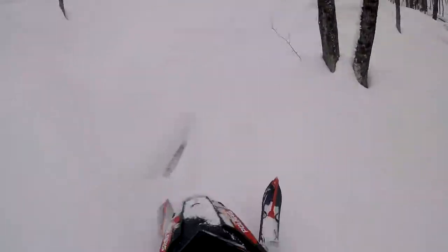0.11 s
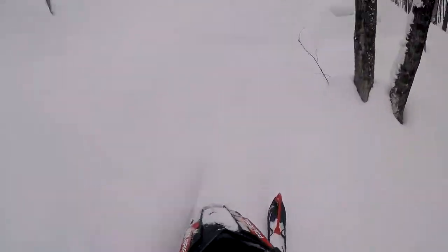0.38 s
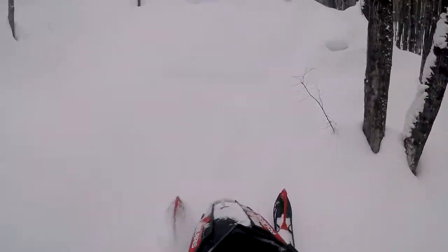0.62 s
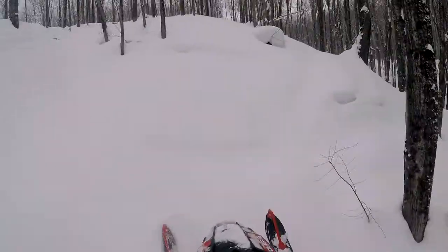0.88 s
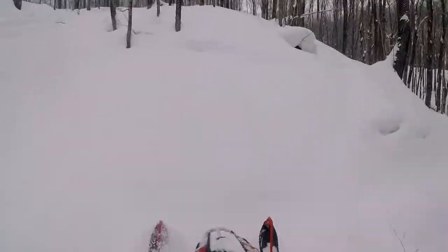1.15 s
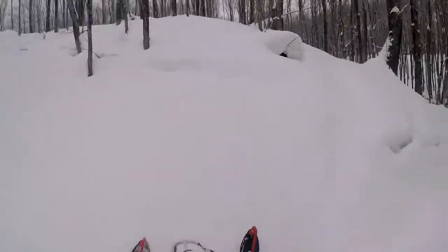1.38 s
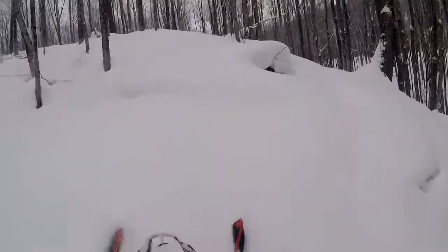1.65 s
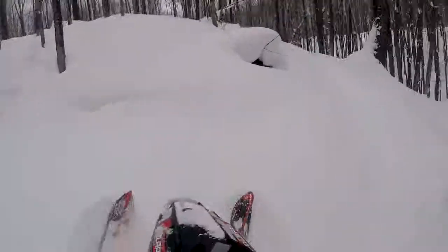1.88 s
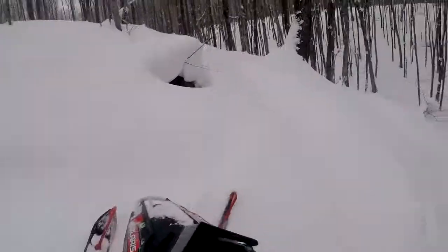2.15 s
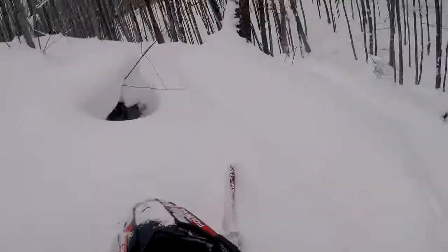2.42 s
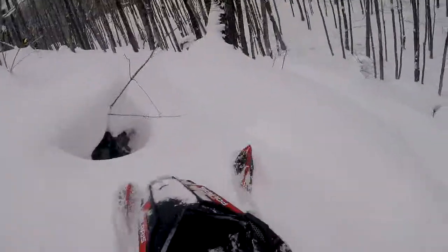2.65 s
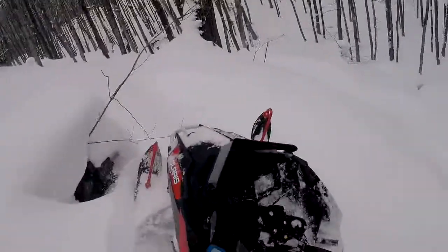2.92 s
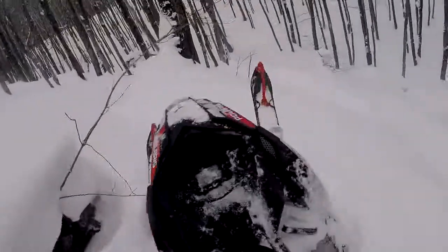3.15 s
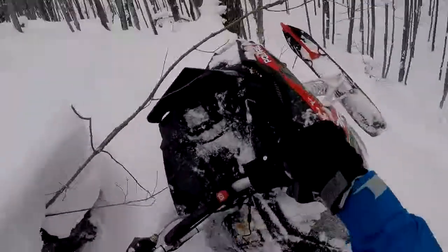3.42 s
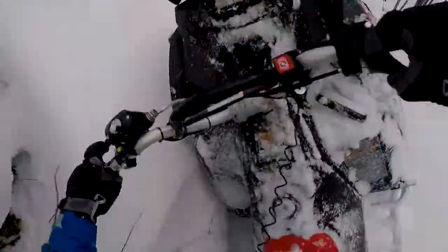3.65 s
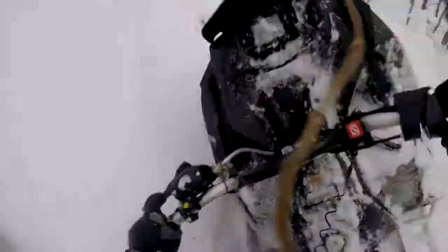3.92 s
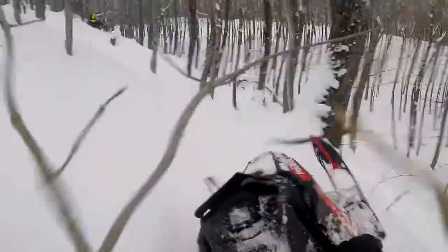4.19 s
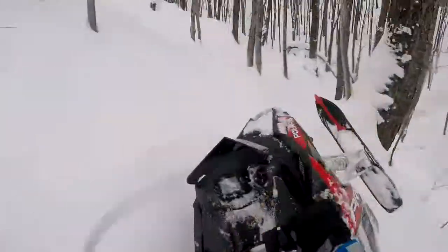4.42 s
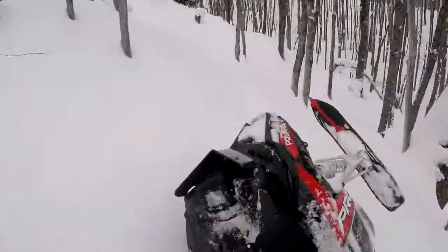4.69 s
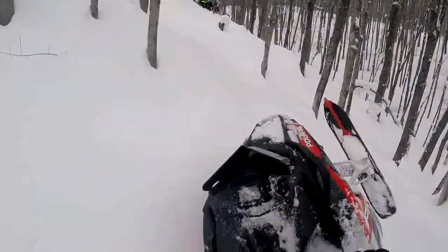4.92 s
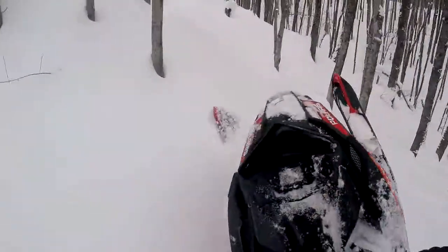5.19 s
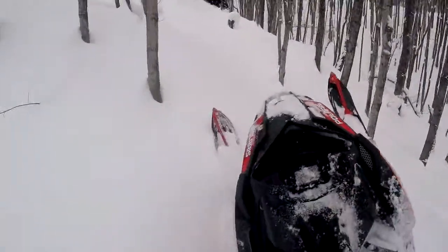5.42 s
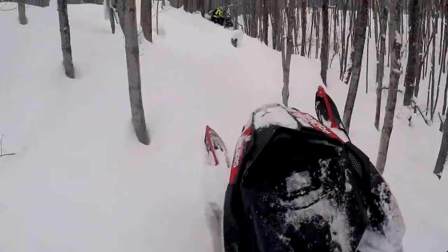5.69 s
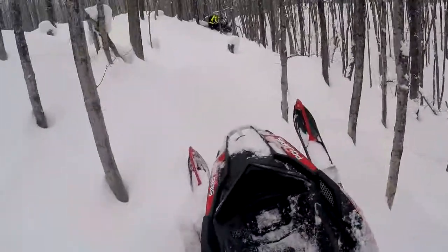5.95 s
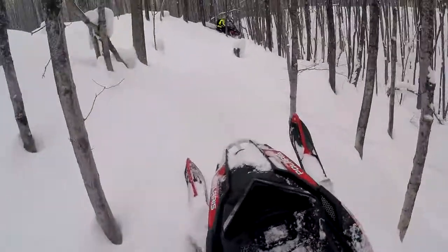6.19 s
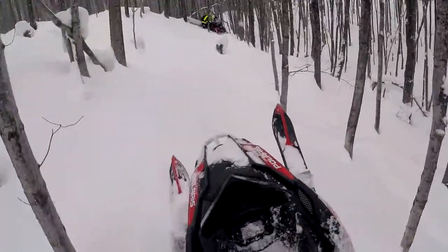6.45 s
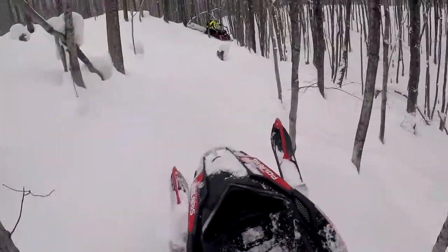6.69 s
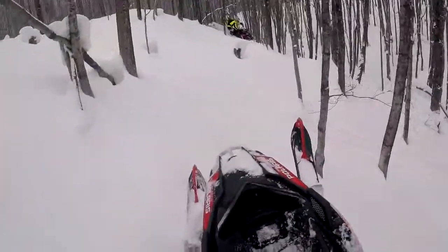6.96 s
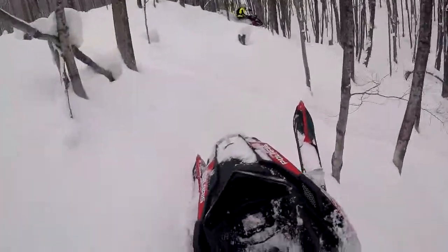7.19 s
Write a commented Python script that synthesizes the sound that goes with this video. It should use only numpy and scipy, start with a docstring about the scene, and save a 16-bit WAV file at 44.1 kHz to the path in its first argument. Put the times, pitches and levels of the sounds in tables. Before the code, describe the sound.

A snowmobile's raspy two-stroke engine revs up and down over low rumble, then a branch cracks and scrapes loudly before the engine swells back.

```python
"""Snowmobile in deep snow, struck by a branch

A two-cylinder two-stroke snowmobile revs up and down, heard by a helmet camera: crank-order tones, coloured
firing pulses and pulsing noise over a lumpy sub-bass. A branch whips and drags across the housing: noise
bursts, ringing modes, membrane swings and random slips crack, thump and scrape. After it the engine sounds
faint and its level swells back."""
import sys
import numpy as np
from scipy import signal
from scipy.fft import rfft, irfft
from scipy.io import wavfile
from scipy.ndimage import uniform_filter1d

SR = 44100
rng = np.random.default_rng(int(sys.argv[2]) if len(sys.argv) > 2 else 0)


def pcm_store(signal):
    """Save signal as 16-bit PCM."""
    levels = np.round(np.clip(np.atleast_2d(signal), -1, 1) * 32767)
    wavfile.write(sys.argv[1], SR, levels.astype(np.int16).T)


def volts_from_decibels(level):
    """Turn decibel levels (scalar or array-like) into linear amplitude factors."""
    exponent = np.asarray(level, float) / 20
    return 10 ** exponent


N = 323253  # length of the sound in samples, about 7.33 s

# modes of the camera housing: mode_hz, level_db, t60_s
HOUSING_MODES = [(650, -6, .05), (810, -1, .045), (960, 0, .03), (1180, 1, .035), (1420, -3, .025),
                 (1830, 0, .045), (2250, -5, .02), (2900, -6, .015)]
# narrow and broad panel resonances of the machine: centre_hz, width_hz, gain_db
PANEL_MODES = [(1412, 35, 10), (1729, 130, 8), (1953, 130, 6.5), (2600, 420, 5), (5020, 1100, 4),
               (6720, 43, 10), (6940, 220, -2), (7770, 410, 11.5), (9900, 190, 2.5), (11360, 130, 5.5),
               (13200, 670, 2)]
CRUISE_HZ = 91  # crank speed at which the speed-dependent levels are neutral


def rms_one(x):
    """Scales x to rms 1."""
    return x / np.sqrt(np.mean(x ** 2) + 1e-20)


def in_time(rows):
    """Draws each column of a curve table at every sample; the first column is time in seconds."""
    s, *columns = np.transpose(rows)
    return [np.interp(np.arange(N) / SR, s, column) for column in columns]


def coloured(x, spectrum, peaks=()):
    """Filters x through a spectrum, straight in dB over log frequency, plus resonances; rms 1."""
    bin_hz = np.fft.rfftfreq(N, 1 / SR)
    hz, db = np.transpose(spectrum)
    gain = volts_from_decibels(np.interp(np.log(bin_hz + 1), np.log(hz), db, left=-120, right=-120))
    for peak_hz, width_hz, peak_db in peaks:
        gain = gain * volts_from_decibels(peak_db / (1 + (2 * (bin_hz - peak_hz) / width_hz) ** 2))
    return rms_one(irfft(rfft(x) * gain, N))


def drift(rate_hz):
    """Slow random wander of rms 1: noise through a two-pole low-pass, drawn every 40 samples."""
    r = np.exp(-80 * np.pi * rate_hz / SR)
    noise = rng.standard_normal(N // 40 + 2002)
    slow = signal.lfilter([1], [1, -2 * r, r * r], noise)[2000:]  # the filter has settled
    return np.interp(np.arange(N) / 40, np.arange(len(slow)), rms_one(slow))


def ring(clicks, hz, t60_s):
    """Two-pole resonator: each unit click starts a decaying unit sine."""
    r = 1000 ** (-1 / (t60_s * SR))
    w = 2 * np.pi * hz / SR
    return signal.lfilter([0, np.sin(w)], [1, -2 * r * np.cos(w), r * r], clicks + 1e-18)


def band(x, low_hz, high_hz):
    """Butterworth band-pass."""
    return signal.sosfilt(signal.butter(2, [low_hz, high_hz], "band", fs=SR, output="sos"), x)


def rumble():
    """Lumpy sub-bass from the track and the rider's jolts, shaking the microphone: coloured noise."""
    # rumble before its lumps: time_s, level_db
    rumble_level = [(0.0, -36), (0.12, -27.5), (0.49, -34.5), (0.53, -25), (1.37, -28), (1.41, -23.5),
                    (1.75, -16), (1.92, -35.5), (2.04, -25), (2.23, -39), (2.28, -24), (2.76, -27),
                    (2.9, -17), (3.18, -27), (3.82, -27), (4.14, -35), (4.23, -21), (4.41, -54),
                    (4.53, -38.5), (4.9, -61.5), (5.39, -28.5), (5.82, -40), (5.9, -24.5), (6.25, -42),
                    (6.41, -27), (6.72, -39.5), (7.19, -26.5), (7.33, -36)]
    # its spectrum: freq_hz, gain_db
    rumble_colour = [(8, -10.5), (15, 18), (24, 19.5), (33, 15), (50, -18), (90, -52), (200, -68.5)]
    level_db, = in_time(rumble_level)
    lumps_db = 2 * drift(4)
    return coloured(rng.standard_normal(N), rumble_colour) * volts_from_decibels(level_db + lumps_db)


def drag():
    """Twigs drag on the housing: dense uneven slips excite its modes, with noise buffeting below."""
    # dragging twigs: time_s, scrape_db, bright_scrape_db, low_buffeting_db
    drag_levels = [(3.72, -34, -58, -40), (3.775, -26.5, -49, -28), (3.8, -21.5, -44, -22),
                   (3.872, -39, -63, -20.5), (3.905, -48, -72, -29.5), (3.93, -36.5, -51, -24.5),
                   (3.99, -28, -57, -23), (4.02, -33.5, -86, -40), (4.2, -33, -46.5, -26),
                   (4.27, -22.5, -36, -28.5), (4.38, -25.5, -40, -40), (4.41, -41, -52, -39),
                   (4.43, -23.5, -38, -40), (4.5, -33, -38, -40), (4.55, -60, -65, -42)]
    scrape_db, bright_db, low_db = in_time(drag_levels)
    on = np.interp(np.arange(N) / SR, [3.717, 3.722, 4.54, 4.56], [0, 1, 1, 0])
    heights_db = 3.3 * np.minimum(rng.exponential(1, N), 4)
    slips = volts_from_decibels(heights_db) * rng.choice([-1, 1], N)
    slips_per_s = 6000 * volts_from_decibels(4.0 * drift(60))
    slips = slips * (rng.random(N) < slips_per_s / SR)
    # the modes ring shorter here than under a blow
    body = rms_one(sum(volts_from_decibels(db) * ring(slips, hz, 0.41 * t60_s) for hz, db, t60_s in HOUSING_MODES))
    grit = rms_one(band(band(slips, 710, 1900), 660, 3000))
    scrape = rms_one(body + 4.1 * grit)
    bright = rms_one(band(slips, 2700, 5100))
    buffeting = rms_one(band(rng.standard_normal(N), 82, 220))
    return on * (volts_from_decibels(scrape_db) * scrape + volts_from_decibels(bright_db) * bright + volts_from_decibels(low_db) * buffeting)


def thumps():
    """Each push swings the microphone membrane for a cycle or two: a heavily damped sine."""
    # pushes on the membrane: start_s, relative_level_db, swing_hz
    pushes = [(3.72, 0.5, 108), (3.735, -2.5, 211), (3.792, -8, 72.4), (3.814, -18, 88.8), (3.849, -1, 93),
              (3.868, -20, 80.7), (3.91, -9, 144), (3.929, -14.5, 54), (3.956, -8.5, 67.5),
              (3.994, -14.5, 83.4), (4.144, -8.5, 96), (4.187, -1.5, 115), (4.209, -21, 50.6),
              (4.244, -8.5, 94), (4.286, -14.5, 85), (4.366, -22, 123), (4.486, -24.5, 191)]
    out = np.zeros(N)
    for s, level_db, swing_hz in pushes:
        click = np.zeros(8000)
        click[0] = volts_from_decibels(level_db + 7.5)
        at = round(s * SR)
        out[at:at + len(click)] += ring(click, swing_hz, 3.74 / swing_hz)
    return out


def snaps():
    """Thin twigs tick on the housing: a few milliseconds of bright noise."""
    # placed ticks: start_s, relative_level_db
    twig_ticks = [(2.4188, -25), (3.6448, -20), (3.719, -5), (4.2018, -23), (4.286, -8.5), (4.2904, -3),
                  (4.295, -11), (4.305, -13.5), (4.314, -7.5), (4.3254, -18), (4.4386, -26), (4.446, -13),
                  (4.4552, -12), (4.463, -3), (4.4753, -17), (4.483, -18), (4.526, -13), (4.5315, -15),
                  (5.014, -22)]
    out = np.zeros(N)
    t = np.arange(int(.03 * SR)) / SR
    # ten faint ticks at random while the thin twigs pass
    faint = [(rng.uniform(4.18, 4.52), rng.normal(-40, 5)) for _ in range(10)]
    for s, level_db in list(twig_ticks) + faint:
        fading = rng.standard_normal(len(t)) * 1000 ** (-t / .007)  # 60 dB down in 7 ms
        tick = band(fading, 4000, 12500)
        at = round(s * SR)
        out[at:at + len(t)] += volts_from_decibels(level_db - 4.0) * tick / np.abs(tick).max()
    return out


def cracks():
    """Each contact is a splintering burst that holds, then stops, beside briefly ringing modes."""
    # contacts: start_s, relative_level_db, low_knock_db and brightness_db (both relative), length_s
    contacts = [(2.418, -28, -24, 7.5, 0.0044), (3.719, 10.5, -29, -7, 0.0048), (3.73, 4, -2, -28, 0.0053),
                (3.736, -3.5, -13, -35, 0.008), (3.787, -5.5, -2.5, -44, 0.0061),
                (3.813, -7, -33, -31, 0.0081), (3.844, -4, -4, -33, 0.0091),
                (3.864, -3.5, 0.5, -31, 0.0069), (3.909, -2, -13.5, -17, 0.0025),
                (3.914, -10, -9, -44, 0.013), (3.955, -10, -14, -28, 0.006), (3.964, -14, -15, -22, 0.0052),
                (3.973, -1.5, -6, -43, 0.003), (3.992, -16, -24, -47, 0.0031), (4, -9.5, -33, -48, 0.0039),
                (4.089, -15, -35, -49, 0.0058), (4.143, -13, 4, -25, 0.011),
                (4.187, -5.5, 0.5, -20, 0.0066), (4.224, -5.5, -29, -31, 0.0027),
                (4.242, -3, -26, -37, 0.0064), (4.257, -12, -15, -16, 0.013), (4.283, -5, -24, 0.5, 0.01),
                (4.304, -12, -26, 4, 0.0043), (4.316, -8, -39, -38, 0.0043), (4.336, -10, -12, -4, 0.0025),
                (4.369, -9.5, -36, -22, 0.0047), (4.43, -13, -23, -7, 0.018), (4.457, -10, -33, -3, 0.0084),
                (4.46, -7, -27, -34, 0.025), (4.486, -2, -26.5, -13.5, 0.0086),
                (4.503, -11.5, -38, -24.5, 0.021), (4.531, -5.5, -31, -11, 0.0077),
                (5.012, -30.5, -22, 7.5, 0.0063)]
    out = np.zeros(N)
    t = np.arange(int(.15 * SR)) / SR
    for s, level_db, low_db, bright_db, length_s in contacts:
        white = rng.standard_normal((2, len(t)))
        # the product of two noises is spiky, as splintering is
        burst = white[0] * np.abs(white[1]) * np.exp(-(t / length_s) ** 2)
        spread_db = rng.normal(0, 4.0, len(HOUSING_MODES))  # each blow excites the modes differently
        body = sum(volts_from_decibels(db + more_db) * ring(burst, hz, t60_s)
                   for (hz, db, t60_s), more_db in zip(HOUSING_MODES, spread_db))
        parts = [(band(body, 1100, 4400), -9.0),
                 (band(burst, 890, 2110), -2.5),
                 (band(body + 8.0 * burst, 370, 625), low_db - 4.0),
                 (band(burst, 1900, 4100), bright_db + 0.5)]
        hit = sum(volts_from_decibels(share_db) * part / np.abs(part).max() for part, share_db in parts)
        at = round(s * SR)
        out[at:at + len(t)] += volts_from_decibels(level_db) * hit
    return out


def leaning(x):
    """As the head turns, 2.2-3.1 kHz rises as what lies under it falls, or the reverse."""
    # tilt of the rasp and buzz: time_s, lean_db
    head_lean = [(0, 2.5), (1.2, 5.5), (2.6, 3), (3.6, 3.6), (5.2, 1), (5.8, 0), (6.2, 4.2), (7.3, 3.5)]
    lean_db, = in_time(head_lean)
    low = signal.sosfiltfilt(signal.butter(3, 2200, fs=SR, output="sos"), x)
    high = signal.sosfiltfilt(signal.butter(3, 3100, "high", fs=SR, output="sos"), x)
    middle = x - low - high
    return low * volts_from_decibels(-lean_db) + middle * volts_from_decibels(lean_db) + high


def order_tone(per_turn, level_db, turns):
    """A sine locked to the crank, per_turn cycles a turn, with a flickering level."""
    return np.sqrt(2) * volts_from_decibels(level_db + 2.3 * drift(13.0)) * np.sin(2 * np.pi * per_turn * turns)


def crank_tones(crank_hz, turns, tones_db, roar_db):
    """Low orders of the crank, coloured by the exhaust pipe and changed when the throttle shuts."""
    # the thumb throttle: opens_s, shuts_s
    throttle = [(.3, 0.75), (1.03, 1.51), (1.66, 1.734), (2.14, 2.57), (2.7, 3.19), (4.78, 4.94),
                (5.21, 5.5), (5.69, 6.2), (6.36, 6.68), (6.68, 7.03), (7.22, 7.3)]
    # cycles per crank turn of each clean order
    orders = [1, 2, 4, 5, 6, 7]
    # for each of them: relative_level_db, loss_with_throttle_shut_db
    order_levels = [(-11.5, -4.5), (-6, 5.5), (-9, 11.5), (-21, 4), (-18, 4), (-22.5, 4.5)]
    # exhaust pipe response: freq_hz, gain_db
    pipe = [(60, 2), (90, -1), (130, 4), (200, 0.5), (270, 0.5), (350, 3), (420, 0), (480, 4.5), (540, 2),
            (650, 1), (850, -8)]
    # near top speed the firing tone thins, then booms in the tuned pipe: crank_hz, gain_db
    boom = [(112, 0), (118, -6), (121, 7), (127, 13.5), (136, 14.5)]
    t = np.arange(N) / SR
    is_open = sum(1. * (np.abs(t - (a + b) / 2) < (b - a) / 2) for a, b in throttle)
    shut = 1 - uniform_filter1d(is_open, size=1501)
    boom_db = np.interp(crank_hz, *np.transpose(boom))
    pipe_hz, pipe_db = np.transpose(pipe)
    tones = np.zeros(N)
    for n, (over_db, loss_db) in zip(orders, order_levels):
        level_db = tones_db + over_db - loss_db * shut + 1.5 * drift(5.5)
        level_db = level_db + np.interp(n * crank_hz, pipe_hz, pipe_db)
        if n == 2:  # two firings a turn
            level_db = level_db + boom_db
        tones += order_tone(n, level_db, turns)
    # two less steady orders follow the roar
    tones += order_tone(1.5, roar_db - 6.0 + 4 * drift(2.7), turns)
    tones += order_tone(3, roar_db - 7.0 + 4 * drift(4.3), turns)
    return tones


def firing_pulses(crank_hz, firing, strength):
    """One impulse a firing, drawn out by reflections in pipe and hood."""
    pulses = np.diff(firing, prepend=0) * strength / np.sqrt(crank_hz)
    echoes = rng.standard_normal(900) * np.exp(-np.arange(900) / (.007 * SR))
    return signal.fftconvolve(pulses, echoes)[:N]


def exhaust_buzz(pulses, crank_hz, rasp_db, slowing):
    """Firing pulses through the exhaust and panels, stronger with speed, weaker on slowing."""
    # exhaust spectrum: freq_hz, gain_db
    exhaust_colour = [(900, -30), (1250, -5), (1500, -4), (2000, -3), (2700, -2), (3200, -14), (3600, -8),
                      (4500, -30), (6000, -60)]
    level_db = rasp_db - 1.5 - 9 * slowing + .09 * (crank_hz - CRUISE_HZ)
    return coloured(pulses, exhaust_colour, PANEL_MODES) * volts_from_decibels(level_db)


def intake_growl(pulses, crank_hz, roar_db, slowing):
    """The same pulses through the intake, stronger with speed, weaker on slowing."""
    # intake spectrum: freq_hz, gain_db
    intake_colour = [(450, -30), (660, 3), (800, 0), (960, 3), (1150, -1), (1500, -25)]
    level_db = roar_db + 2.5 - 10 * slowing + (crank_hz - 110) / 9
    return coloured(pulses, intake_colour) * volts_from_decibels(level_db)


def firing_rasp(turns, strength, rasp_db, treble_db, slowing):
    """Hiss that jumps at each firing and dies towards the next; its treble has its own level."""
    # rasp spectrum: freq_hz, gain_db
    rasp_colour = [(650, -38), (1100, -24.5), (1400, -9.5), (1900, -5.5), (2600, -3), (3200, -13),
                   (3550, -4.5), (4300, -20.5), (6600, -26.5), (7100, -28.5), (8400, -34.5), (10600, -35),
                   (13000, -32), (14000, -40.5), (15200, -41), (15400, -84.5)]
    since_firing = 2 * turns % 1  # 0 at one firing, 1 at the next
    hiss = rng.standard_normal(N) * (1 + 0.2 * strength * np.exp(-2.5 * since_firing))
    whole = coloured(hiss, rasp_colour, PANEL_MODES)
    upper = signal.sosfiltfilt(signal.butter(4, 4500, "high", fs=SR, output="sos"), whole)
    lower_db = rasp_db - 1.1 + 2.44 * slowing + 1.8 * drift(5.8)
    return (whole - upper) * volts_from_decibels(lower_db) + rms_one(upper) * volts_from_decibels(treble_db + 0.6)


def low_roar(roar_db):
    """Broad low noise of the machine with a wavering level."""
    # roar spectrum: freq_hz, gain_db
    roar_colour = [(40, -3), (70, 9.5), (130, -4), (250, 4.5), (450, -2.5), (800, -5.5), (1200, -5.5),
                   (1600, -21.5), (3000, -58)]
    return coloured(rng.standard_normal(N), roar_colour) * volts_from_decibels(roar_db + 6.0 + 1.5 * drift(9.9))


def engine():
    """One crank phase drives the order tones, the firing pulses and the gated hiss; roar is added."""
    # engine curve, rasp as reference level: time_s, crank_turns_hz, rasp_db
    engine_curve = [(0.0, 91.06, -33.5), (0.21, 74.25, -38.5), (0.3, 67.79, -39.5), (0.39, 70.62, -39.5),
                    (.45, 81, -34), (0.51, 91.26, -31.5), (.66, 114, -28.5), (0.72, 122.8, -29.5),
                    (0.84, 95.64, -34.5), (1.0, 73.03, -40), (1.06, 75.2, -37), (1.14, 85.49, -31.5),
                    (1.23, 97.53, -31), (1.34, 120.2, -26.5), (1.39, 129.7, -26), (1.48, 136.1, -26),
                    (1.63, 96.95, -34), (1.68, 90.48, -34), (1.8, 88.37, -34.5), (2.03, 68.56, -41),
                    (2.13, 64.05, -43.5), (2.28, 67.64, -43), (2.48, 68, -40.5), (2.63, 62.36, -42),
                    (2.7, 63.44, -40.5), (2.84, 83.16, -29), (2.95, 98.67, -28), (3.07, 119.3, -23.5),
                    (3.13, 125.7, -24.5), (3.2, 115, -24.5), (3.27, 100.5, -29.5), (3.41, 74.24, -36),
                    (3.51, 64.92, -39), (3.7, 60.2, -36.5), (4.5, 85.9, -52.5), (4.58, 86.3, -59),
                    (4.68, 86.7, -63.5), (4.77, 76.96, -65), (5.0, 96.4, -56), (5.08, 87.23, -50.5),
                    (5.2, 78.15, -48), (5.32, 90.52, -41.5), (5.47, 115.5, -34), (5.53, 121.9, -33.5),
                    (5.7, 94.68, -36), (5.88, 112.7, -30), (5.94, 112.7, -31.5), (6.03, 106.6, -31.5),
                    (6.19, 118.4, -26), (6.37, 90.56, -32), (6.52, 100.5, -29.5), (6.67, 87.2, -34),
                    (6.81, 100.3, -27.5), (6.89, 112.6, -26), (6.95, 118.9, -26.5), (7.08, 121.4, -25.5),
                    (7.18, 117, -27), (7.28, 109, -29), (7.33, 110, -28.5)]
    # balance of roar, treble and tones against the rasp, shifting as the engine swells back:
    # time_s, roar_db, treble_db, tones_db
    layer_balance = [(0, -17.5, -14, -1), (.6, -14.5, -13, 0.5), (1.2, -15.5, -14, 0),
                     (1.8, -13.5, -13, -1), (2.3, -15, -9, 0.5), (3.0, -18.5, -15.5, -3),
                     (3.6, -13.5, -13.5, -3), (4.58, -8.5, -10.5, 11), (4.75, -4.5, -0.5, 1.5),
                     (5.0, -12, -8, -3), (5.1, -18, -17.5, -4.5), (5.6, -18.5, -17, -2),
                     (6.2, -16.5, -15, -2), (6.8, -18.5, -14, -4), (7.3, -18, -15.5, -0.5)]
    crank_hz, rasp_db = in_time(engine_curve)
    roar_over_db, treble_over_db, tones_over_db = in_time(layer_balance)
    # how each balance shifts with speed, in dB per Hz of crank
    speed_hz = crank_hz - CRUISE_HZ
    roar_db = rasp_db + roar_over_db - 0.03 * speed_hz
    treble_db = rasp_db + treble_over_db + 0.0081 * speed_hz
    tones_db = rasp_db + tones_over_db - 0.1174 * speed_hz

    turns = np.cumsum(crank_hz * (1 + .0015 * drift(12))) / SR
    # 0 = steady or rising, 1 = falling by 120 Hz a second or faster
    slowing = np.clip(-uniform_filter1d(np.gradient(crank_hz) * SR, size=2001) / 120, 0, 1)
    firing = (2 * turns).astype(int)
    uneven_db = rng.normal(0, .8, firing[-1] + 1)[firing]
    strength = volts_from_decibels(uneven_db - 9.0 * (firing % 2))  # one cylinder is louder

    pulses = firing_pulses(crank_hz, firing, strength)
    tones = crank_tones(crank_hz, turns, tones_db, roar_db)
    buzz = exhaust_buzz(pulses, crank_hz, rasp_db, slowing)
    growl = intake_growl(pulses, crank_hz, roar_db, slowing)
    rasp = firing_rasp(turns, strength, rasp_db, treble_db, slowing)
    roar = low_roar(roar_db)
    # the engine drops away while the branch is on the housing
    struck = np.interp(np.arange(N) / SR, [3.697, 3.703, 4.5, 4.58], [0, 1, 1, 0])
    return (1 - .5 * struck) * tones + (1 - 0.87 * struck) * (leaning(buzz + rasp) + growl + roar)


def scene():
    """Rumble, branch and machine add up at one microphone."""
    branch = drag() + thumps() + snaps() + cracks()
    return (rumble() + branch + engine())[None]


def top_cut(x):
    """Nothing passes above the cut-off."""
    return signal.sosfilt(signal.butter(12, 16320, fs=SR, output="sos"), x)


def record(dry):
    """The loudest blows overload the input; faint circuit hiss joins; the top is cut."""
    clipped = np.clip(dry, -1.0, 1.0)
    noisy = clipped + volts_from_decibels(-71) * rng.standard_normal(dry.shape)
    cut = signal.sosfilt(signal.cheby2(8, 40, 16000, fs=SR, output="sos"), noisy)
    return top_cut(np.clip(cut, -1.0, 1.0))


dry = scene()
out = record(dry)
pcm_store(out)
```